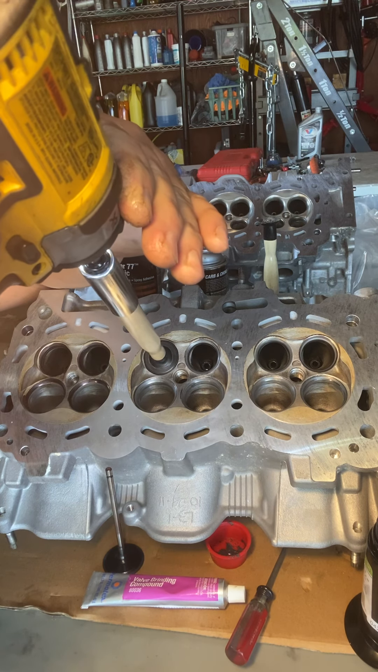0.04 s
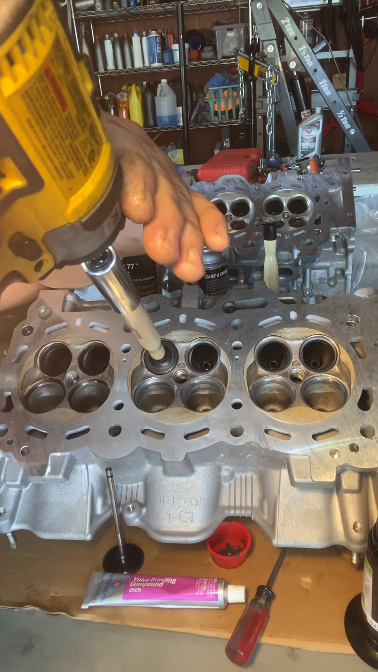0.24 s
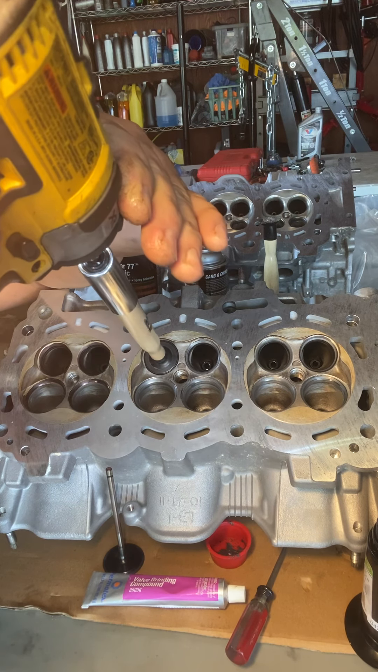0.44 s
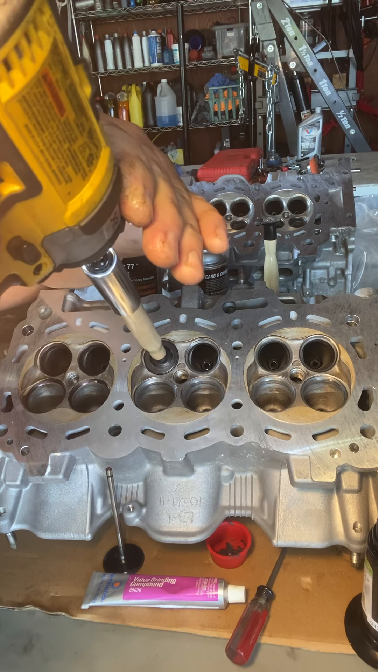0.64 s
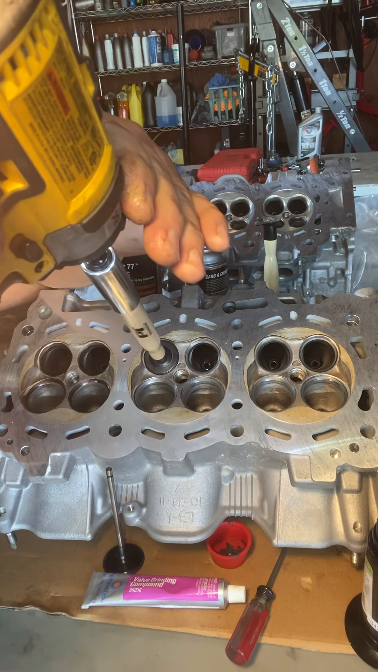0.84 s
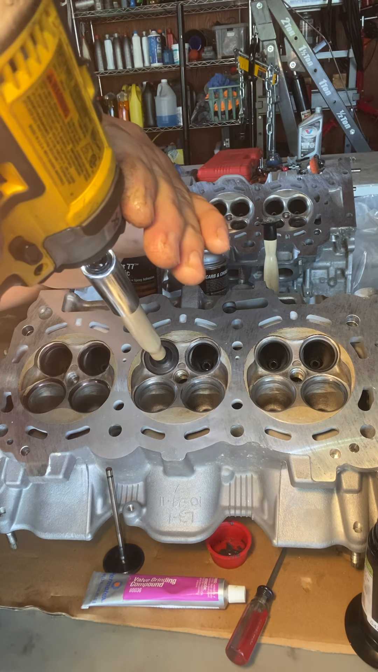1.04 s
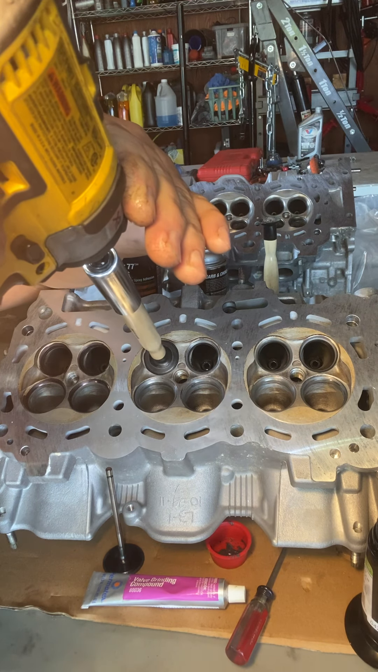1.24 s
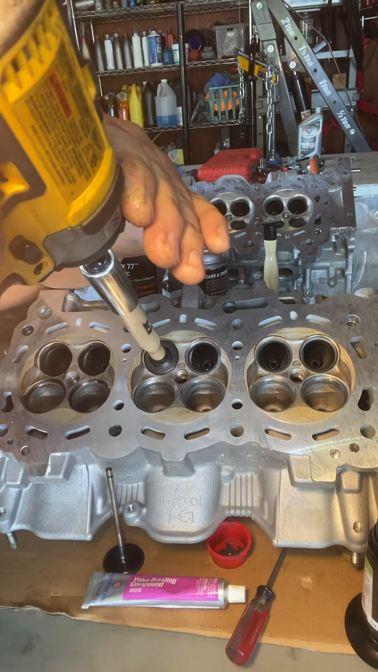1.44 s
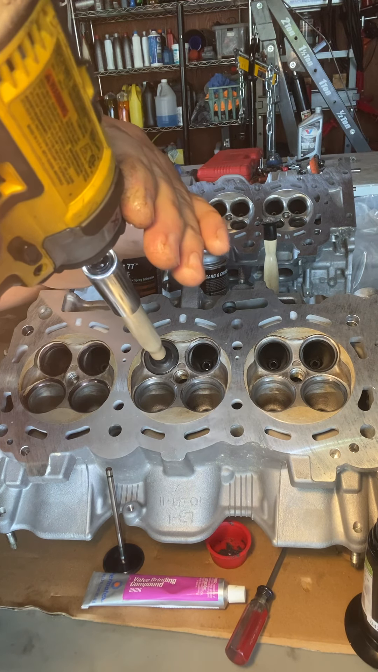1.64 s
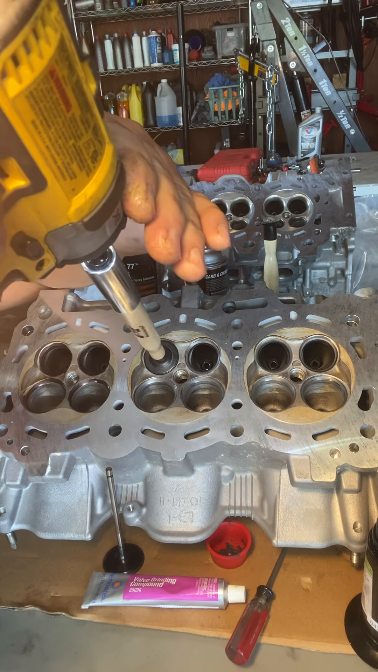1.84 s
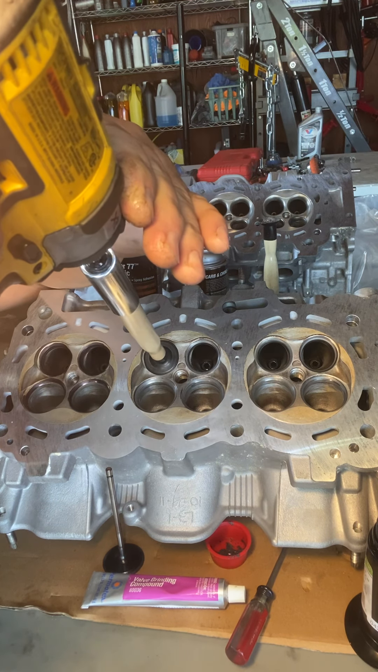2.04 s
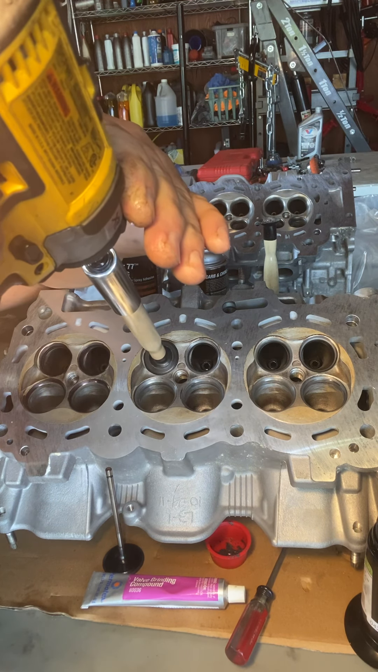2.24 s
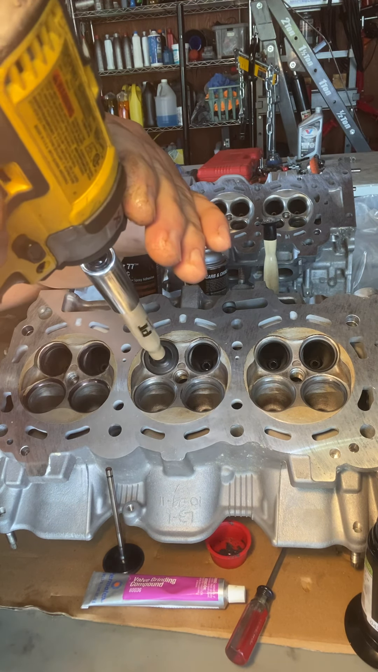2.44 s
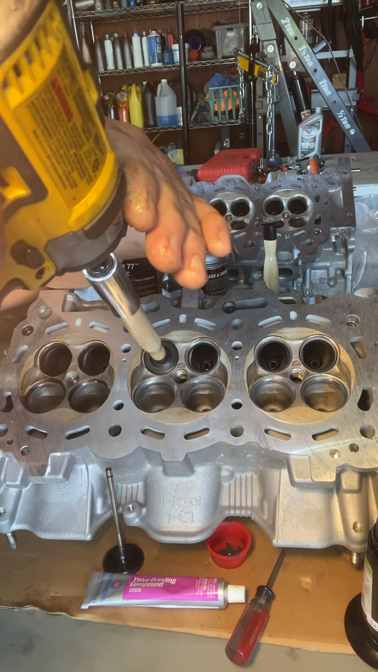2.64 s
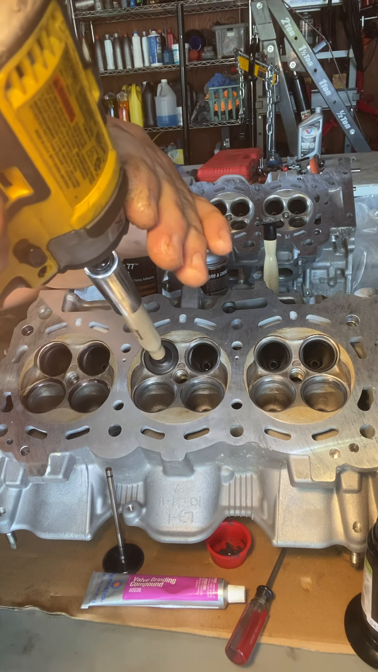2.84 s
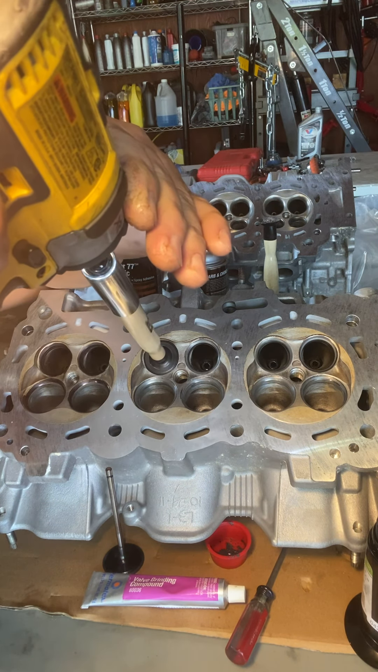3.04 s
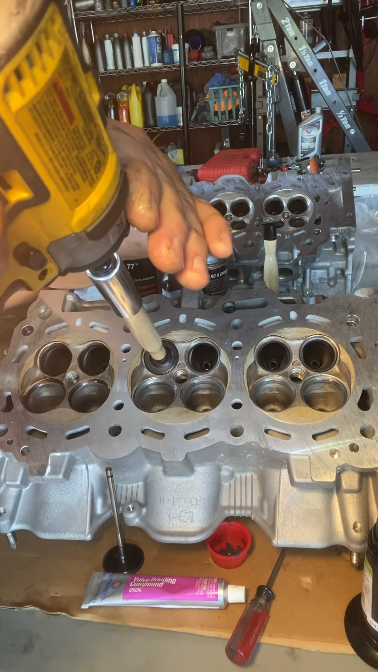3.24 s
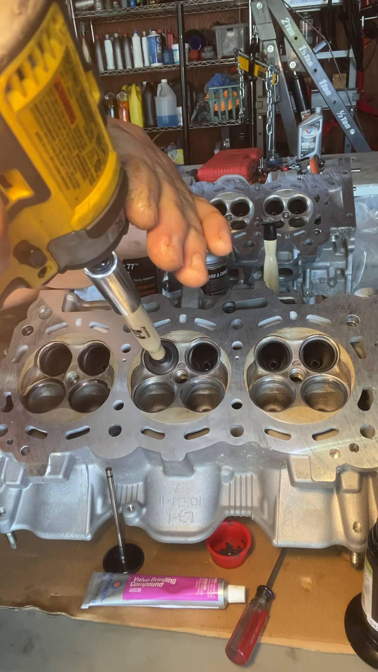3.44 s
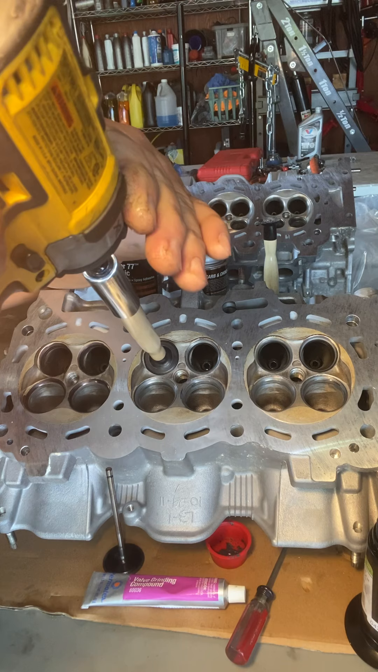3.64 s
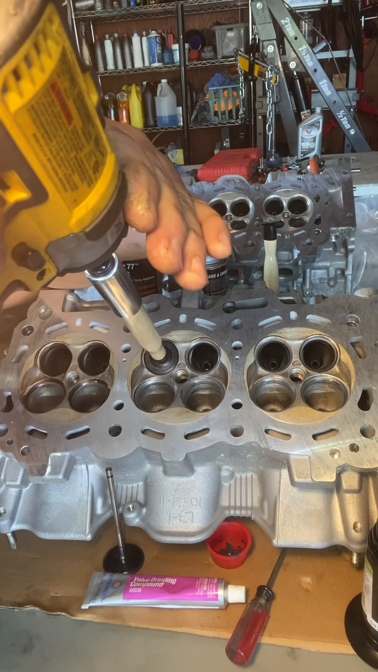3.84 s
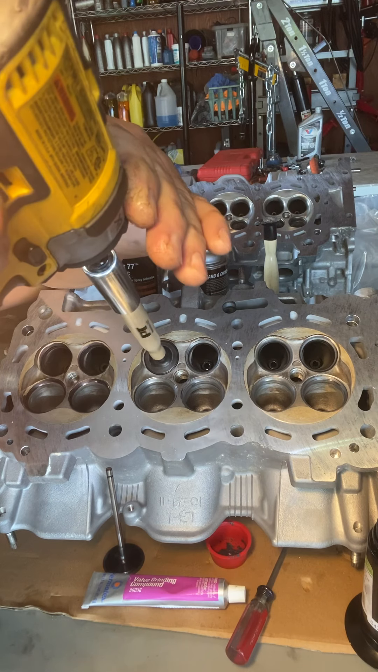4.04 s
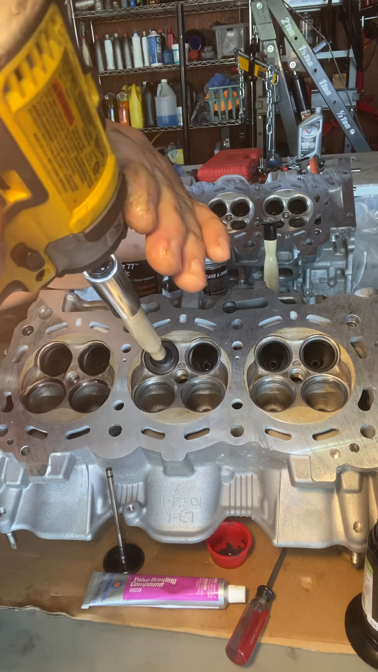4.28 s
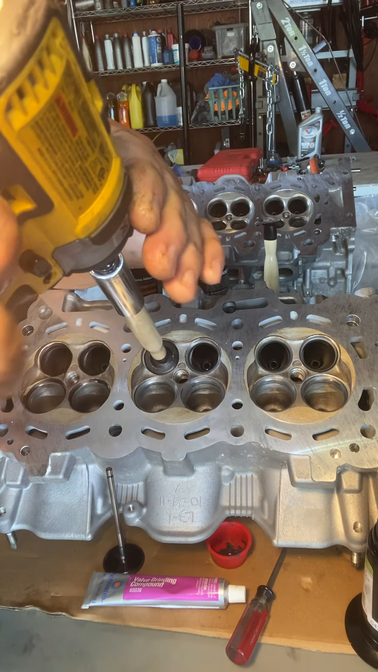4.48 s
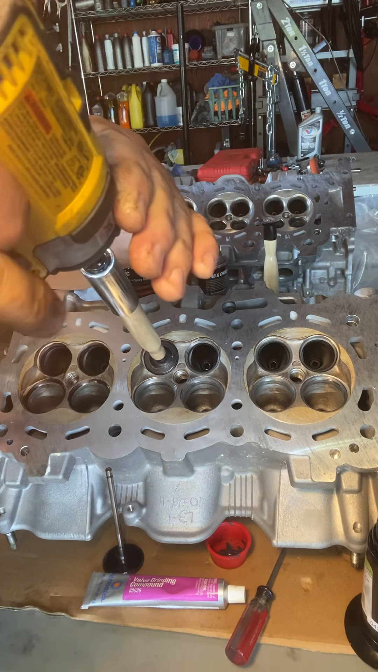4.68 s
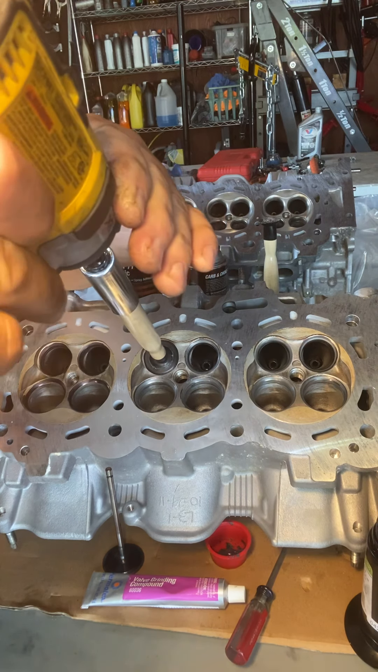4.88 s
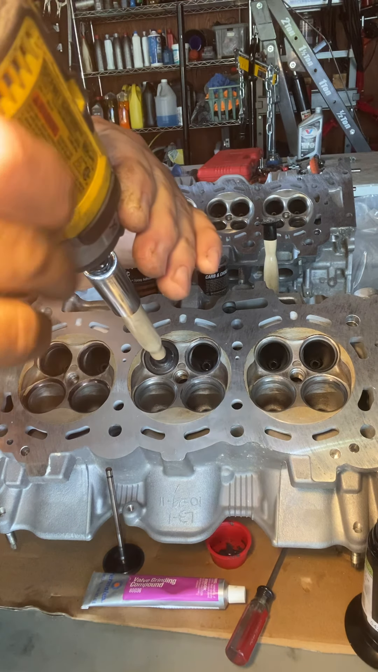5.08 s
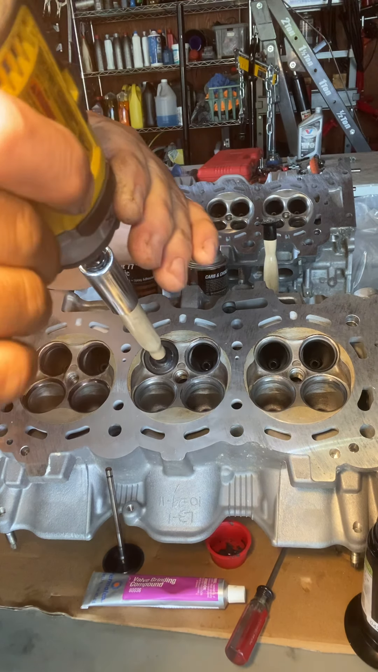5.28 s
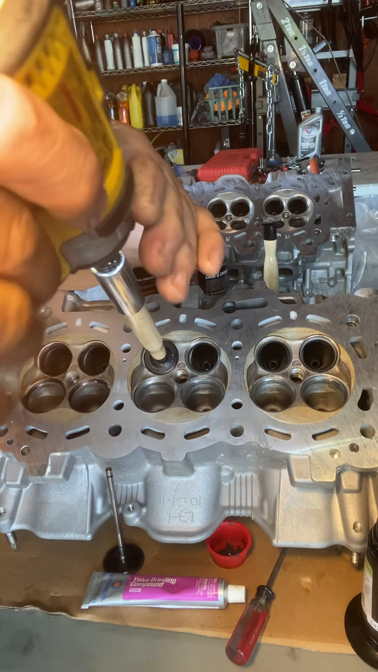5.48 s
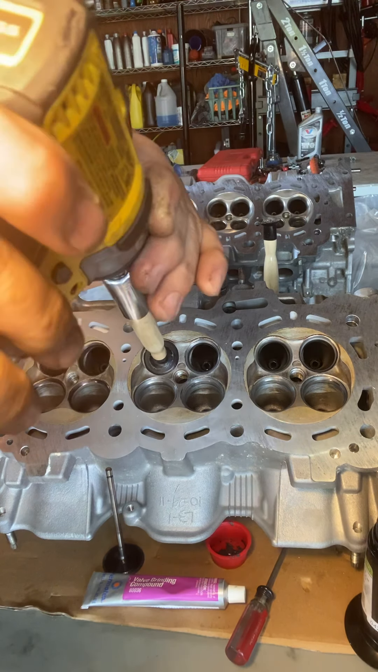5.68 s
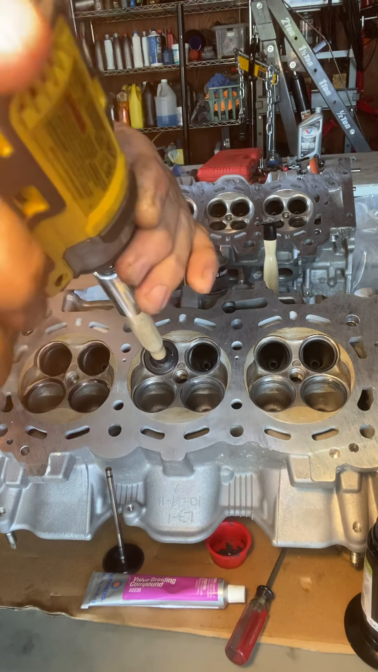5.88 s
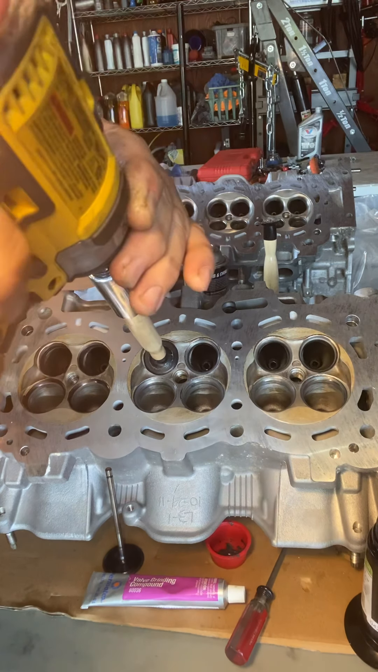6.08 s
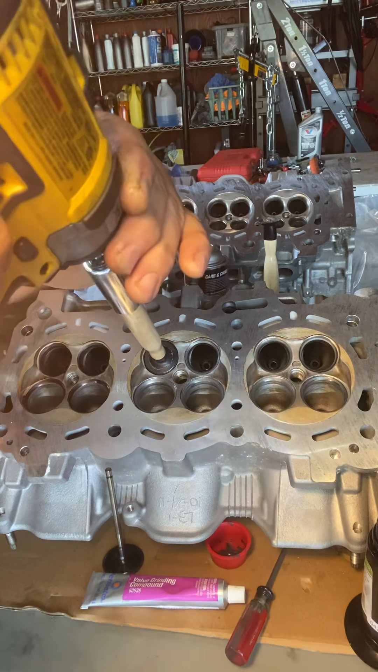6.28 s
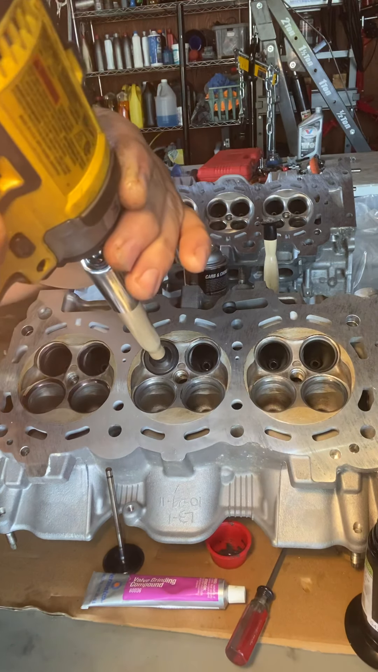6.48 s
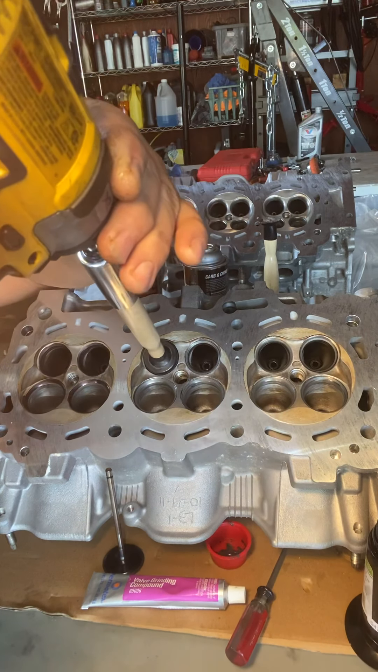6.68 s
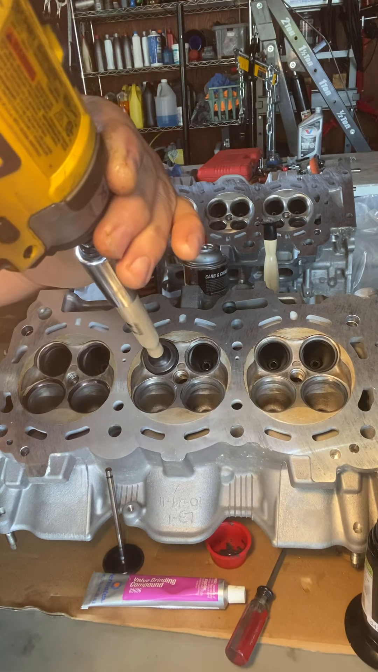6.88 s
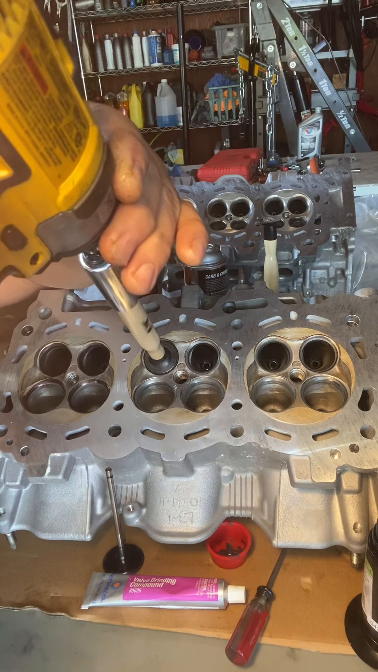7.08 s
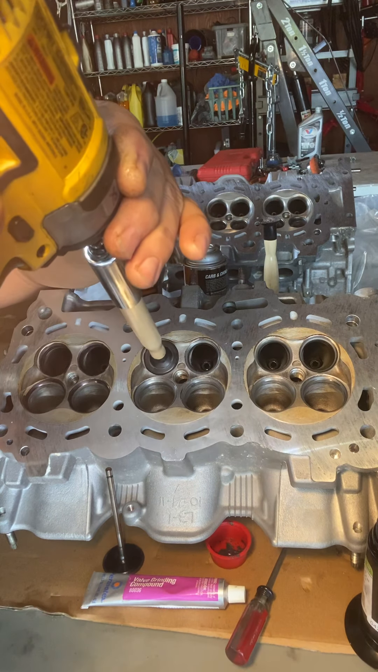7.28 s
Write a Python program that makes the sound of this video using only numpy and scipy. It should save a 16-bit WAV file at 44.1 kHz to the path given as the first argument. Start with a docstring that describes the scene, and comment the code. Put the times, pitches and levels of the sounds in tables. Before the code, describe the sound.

From 0 to 4.3 seconds, a cordless driver grinds a valve on its metal seat close by. Gritty hiss and bright head ringing run continuously, with a narrow stuttering chatter that fades as the paste wears. Gear knocks, roughly a hundred a second, form two rough bursts per half-second turn, separated by short dull rasps. At 4.32 a hard, dry click stops everything, with a brief loose rattle. Scattered knocks and light scrapes follow, strongest in a clustered clack near 5.2 and another at 5.45; gritty nudges come near 5.9 and 6.1, with very faint electronic whistles. At 6.27 the driver restarts lightly: socket rattle, then from 6.4 motor hum and wobbling gear whine with clicks. At 7.1 the valve bites, adding harsh grinding, rasp and chatter to the end. A small workshop gives short echoes over low rumble and faint wavering hum.

```python
"""Lapping an engine valve with a cordless driver

Close by, the driver spins a valve on its seat: grit hisses and rings the cylinder head, gears knock in bursts.
A sharp click rings the driver's nose, then the tool knocks in its socket as the grip changes.
The second run is light: the loose socket rattles, motor and gears whine, until the valve bites and grinds.
Noise and sine tones are shaped by resonances; a small workshop adds echoes, a low rumble and a wavering hum."""
import sys
import numpy as np
from scipy import signal
from scipy.fft import rfft, irfft, next_fast_len
from scipy.io import wavfile

SR = 44100
rng = np.random.default_rng(int(sys.argv[2]) if len(sys.argv) > 2 else 0)


def store_pcm(level_fs):
    """Save levels as 16-bit WAV."""
    pcm = np.round(np.clip(level_fs, -1, 1) * 32767).astype(np.int16)
    wavfile.write(sys.argv[1], SR, np.atleast_2d(pcm).T)


N = 322812
TIME = np.arange(N) / SR
SIZE = next_fast_len(N + SR)
FREQ = np.maximum(np.arange(SIZE // 2 + 1) * SR / SIZE, 1)

# loaded run: gear cycles per second at first, before surges and tremble; their slow sag; the motor is let go
LOADED_HZ, SAG_HZ_PER_S, STOP_S = 104.6, 2.2, 4.316
# the crooked tool bears hardest once a spindle turn: one such moment, and the length of a turn
HARDEST_S, TURN_S = 0.385, 0.53
# the paste wears fine between these times
WEAR_FROM_S, WORN_S = 1.12, 4.6
# the spindle lock shuts
LOCK_S = 4.3236
# second run: the motor starts, the socket catches the tool, the valve bites
START_S, CATCH_S, BITE_S = 6.267, 6.385, 7.106
# lightly loaded, the tool wobbles: one moment of tightest mesh, and the length of a wobble
TIGHTEST_S, WOBBLE_S = 6.67, 0.141


def undb(db):
    """Decibels to gain."""
    return np.exp(np.asarray(db) * (np.log(10) / 20))


def unit(x):
    """Scale to rms 1."""
    return x / np.sqrt(np.mean(x ** 2))


def shape(points):
    """Gain at every frequency from (Hz, dB) points, interpolated over log frequency."""
    hz, db = np.transpose(points)
    return undb(np.interp(np.log(FREQ), np.log(hz), db))


def filtered(x, response):
    """Pass a sound through a frequency response."""
    return irfft(rfft(x, SIZE) * response, SIZE)[:N]


def resonate(x, hz, width):
    """One resonance of the given width in Hz, gain 1 at its centre."""
    return signal.lfilter(*signal.iirpeak(hz, hz / width, fs=SR), x)


def resonate_twice(x, hz, width):
    """The same resonance twice over, for steeper sides."""
    return resonate(resonate(x, hz, width), hz, width)


def body(x, modes):
    """Ring a set of broad modes, with alternating signs."""
    return sum(undb(db) * resonate(x, hz, width) * (-1) ** k for k, (hz, width, db) in enumerate(modes))


def noise():
    """White noise."""
    return rng.standard_normal(N)


def walk(rate):
    """Smooth chance with spread 1, changing about rate times a second."""
    step = 32
    count = N // step + 1
    keep_slow = np.exp(-(np.fft.rfftfreq(count, step / SR) / rate) ** 2)
    slow = irfft(rfft(rng.standard_normal(count)) * keep_slow, count)
    return unit(np.interp(np.arange(N) / step, np.arange(count), slow))


def grains(spread_db):
    """Dense tiny fractures: noise whose level jumps every 16 samples."""
    sizes = np.repeat(rng.standard_normal(N // 16 + 1), 16)[:N]
    return unit(noise() * undb(spread_db * sizes))


def ticks(phase, scatter_db):
    """One impulse of uneven size for each whole cycle."""
    count = np.maximum.accumulate(np.floor(phase))
    return np.diff(count, prepend=count[0]) * undb(scatter_db * np.clip(noise(), -2, 2))


def held(start_s, end_s=np.inf, fade_s=0.0037):
    """Gain 1 from start to end, with short fades outside."""
    return np.clip(np.minimum(TIME - start_s, end_s - TIME) / fade_s + 1, 0, 1)


def swell(centre_s, width_s):
    """A bell-shaped rise and fall with peak 1."""
    return np.exp(-((TIME - centre_s) / width_s) ** 2)


def spindle_turns():
    """Turns made by the spindle under load."""
    return (TIME - HARDEST_S) / TURN_S


def each_turn(share, width, squareness=1):
    """A swell at the same place in every turn; squareness above 1 flattens its top and steepens its sides."""
    offset = (spindle_turns() - share + 0.5) % 1 - 0.5
    return np.exp(-abs(offset / width) ** (2 * squareness))


def wobble():
    """Swing of the lightly loaded tool, 1 where the gears mesh tightest."""
    return np.cos(2 * np.pi * (TIME - TIGHTEST_S) / WOBBLE_S)


def wear():
    """State of the paste, from 0 (fresh and coarse) to 1 (ground fine)."""
    return np.interp(TIME, [WEAR_FROM_S, WORN_S], [0, 1])


def workshop(air_db=-53, hum_hz=93.3, hum_db=-56, width_db=-12):
    """Low rumble and a wavering hum around the microphones; the rumble's upper air differs between the ears."""
    # Each row: frequency in Hz, relative level in dB per Hz of the workshop air.
    air_spectrum = [(20, -43), (37, -21), (62, -7.5), (86, -9.5), (130, -20), (255, -26.5), (560, -30.5),
                    (1200, -34.5), (2000, -38.5), (3000, -51.5), (7000, -56.5), (16000, -75)]
    mid, other = (unit(filtered(noise(), shape(air_spectrum))) for _ in range(2))
    side = undb(width_db) * filtered(other, FREQ / np.hypot(FREQ, 300))
    hum_cycles = np.cumsum(hum_hz + 1.48 * walk(3.83)) / SR
    hum = np.sin(2 * np.pi * hum_cycles) * undb(hum_db + 0.61 * walk(3.8))
    return undb(air_db) * np.array([mid + side, mid - side]) + hum


def gear_phase(wander=0.0048, surge=0.037, surge_share=0.07, surge_width=0.17,
               dip=0.018, dip_share=0.39, dip_width=0.07, light_sway=0.012, light_wander=0.005):
    """Gear cycles: loaded, they surge and are held back each turn and tremble; light, they sway with the wobble.

    The count keeps its loaded pace through the pause."""
    # Gear speed in the second run. Each row: time in seconds, cycles per second in Hz before sway and tremble.
    light_speed = [(6.26, 44.93), (6.33, 68), (6.42, 75.8), (6.48, 88.74), (6.68, 92.45), (6.77, 90.4),
                   (6.91, 93.1), (7.03, 91.03), (7.24, 89.7), (7.31, 86.4)]
    swing = surge * each_turn(surge_share, surge_width) - dip * each_turn(dip_share, dip_width)
    loaded = (LOADED_HZ - SAG_HZ_PER_S * TIME) * (1 + swing + wander * walk(25))
    light = np.interp(TIME, *np.transpose(light_speed))
    light = light * (1 + light_sway * wobble() + light_wander * walk(40))
    return np.cumsum(np.where(TIME < START_S, loaded, light)) / SR


def bearing(lag_turns=0, slack_db=-12):
    """How hard the crooked tool bears: it takes hold and lets go twice a turn, with slack between."""
    # Each row: place as a share of the turn, half width as a share of the turn, force in dB before slack.
    holds = [(0.018, 0.15, -4.5), (0.583, 0.093, -5.5)]
    grip = sum(undb(db) * each_turn(share + lag_turns, width, squareness=8.3) for share, width, db in holds)
    return np.hypot(undb(slack_db), grip)


def backlash(phase, level_db=-42.0, slop=0.005, scatter_db=1.3, growth_db=2.0, uneven_db=1.0, soft_hz=6000,
             valve_db=-6.0, valve_lag_turns=0.1, slide_db=-57):
    """Loaded gears slide and knock once a cycle, in two bursts a turn that start dull and crisp up as the valve jolts."""
    # What a knock of the teeth rings, damped by the hand.
    # Each row: frequency in Hz, width in Hz, relative level in dB.
    knock_modes = [(200, 55, -8), (390, 70, -9), (526, 130, -10.5), (750, 85, -1), (822, 100, 3),
                   (1054, 110, -1.5), (1157, 150, 0.5), (1350, 120, -1)]

    def case(x):
        """The gear case heard through the hand's damping."""
        return unit(sum(undb(db) * resonate(x, hz, width) for hz, width, db in knock_modes))

    blows = undb(level_db + growth_db * wear() + uneven_db * walk(5))
    # grease softens each contact
    contact = filtered(ticks(phase + slop * walk(60), scatter_db), np.exp(-(FREQ / soft_hz) ** 2))
    valve = unit(resonate(resonate(contact, hz=1860, width=890), hz=1960, width=1300))
    jolts = undb(valve_db) * bearing(valve_lag_turns) * valve
    sliding = undb(slide_db) * case(noise())
    return held(0, STOP_S) * (blows * (bearing() * case(contact) + jolts) + sliding)


def whine(phase, orders, flutter_db):
    """Harmonics of the turning gears, each fluttering a little."""
    return unit(sum(undb(db + flutter_db * walk(21)) * np.sin(2 * np.pi * k * phase) for k, db in orders))


def grinding(phase, force, ring_db, hiss_db=-1.0, ring_width=9, throb=0.12, patchy_db=1.5):
    """Grit crushed on the seat hisses and rings the head; the hiss throbs twice a gear cycle."""
    # Each row: frequency in Hz, relative level in dB per Hz of the crushed grit.
    grit_spectrum = [(200, -17), (600, -10.5), (1300, -4), (1550, -3.5), (1800, -1), (2500, -1.5),
                     (3200, -4), (4300, 1.5), (4900, -3), (6300, -1.5), (7100, 2), (8000, -0.5), (9600, -2),
                     (10200, -6), (11400, -7), (12200, -34), (14000, -83.5)]
    # Modes of the cylinder head. Each row: frequency in Hz, relative level in dB.
    head_modes = [(2277, -64), (3122, -57.5), (3451, -60.5), (3696, -53), (3835, -61), (4030, -64.5),
                  (4506, -60.5), (4770, -62.5), (5060, -65.5), (5636, -57), (5733, -61.5), (5829, -54),
                  (5997, -55.5), (6078, -58), (6148, -64.5), (6487, -63.5), (6600, -56.5), (6691, -51.5),
                  (6934, -63), (7070, -57.5), (7114, -52.5), (7254, -54.5), (7407, -61.5), (7720, -57),
                  (8341, -57.5), (8771, -65), (8942, -52.5), (9135, -67.5), (9254, -60.5), (9481, -55.5),
                  (9647, -61), (10977, -60.5)]
    crush = grains(spread_db=3) * force * (1 + throb * np.cos(4 * np.pi * phase))
    hiss = filtered(crush, unit(shape(grit_spectrum)))
    # the contact travels round the seat, so each mode is fed unevenly
    feed = force * noise()
    ring = sum(undb(db + patchy_db * walk(11)) * resonate(feed, hz, ring_width) for hz, db in head_modes)
    ring = signal.sosfilt(signal.cheby1(8, 0.5, 11500, fs=SR, output="sos"), ring)
    return undb(hiss_db) * hiss + undb(ring_db) * unit(ring) * np.std(crush)


def chatter(hz, width):
    """Stick and slip of the valve face in one narrow resonance."""
    return unit(resonate_twice(grains(0.55), hz, width))


def lapping(phase, grit_db=-37, grit_wear_db=3, whine_db=-15.5, whine_wear_db=3, unsteady_db=0.5,
            scour_db=2, scour_share=0.73, scour_width=0.17, ring_db=0.57, ring_wear_db=2.5):
    """The loaded valve scours hardest once a turn; grinding, ringing, chatter and whine fade as the paste wears."""
    # Gear harmonics under load. Each row: multiple of the gear cycle, relative level in dB.
    loaded_orders = [(2, -6), (3, 1.5), (4, -4.5), (5, -3.5), (7, -4), (8, -2), (11, -5)]
    # Resonances in which the valve face chatters. Each row: frequency in Hz, width in Hz,
    # level in dB with fresh paste before the swing of pressure, dB lost by wear.
    face_modes = [(2052, 144, -40.5, 19.5), (2278, 47, -49, 13.5), (2722, 61, -53, 8)]
    pressure = held(0, STOP_S) * undb(scour_db * (each_turn(scour_share, scour_width) - 0.5))
    grit = pressure * undb(grit_db - grit_wear_db * wear() + unsteady_db * walk(3.0))
    gear_tone = undb(whine_db - whine_wear_db * wear()) * grit * whine(phase, loaded_orders, flutter_db=2.5)
    gears = backlash(phase) + gear_tone
    valve = pressure * sum(undb(db - wear_db * wear()) * chatter(hz, width)
                           for hz, width, db, wear_db in face_modes)
    return gears + grinding(phase, grit, ring_db - ring_wear_db * wear()) + valve


def shudder(first_db=-49, settle_s=0.34, bite_db=-37.5):
    """The valve shudders an octave below its chatter: at first, soon settling, and again from the late bite."""
    return (undb(first_db) * swell(0, settle_s) + undb(bite_db) * held(BITE_S)) * chatter(hz=1017, width=55)


def drag(length_s=0.046):
    """The tool drags in its socket with a short, dull rasp, between bursts and once in the light run."""
    # Each row: time in seconds, level in dB.
    drags = [(1.11, -50.5), (1.64, -48.5), (2.18, -46), (2.68, -47), (3.22, -46), (3.74, -48.5),
             (6.84, -47.5)]
    # Each row: frequency in Hz, relative level in dB per Hz of the rasp.
    rasp_spectrum = [(150, -26.5), (350, -1.5), (750, 0), (1300, -6.5), (2500, -19), (8000, -43)]
    force = sum(undb(db) * swell(s, length_s) for s, db in drags)
    return force * unit(filtered(grains(spread_db=5), shape(rasp_spectrum)))


def stop_click(level_db=19.5, crack_db=-26, crack_s=0.0024, crack_hz=6900, crack_width=3800, top_hz=9000):
    """The spindle lock snaps shut: one hard blow rings the driver's nose, with a short dry crack."""
    # Modes of the driver's nose. Each row: frequency in Hz, width in Hz, relative level in dB.
    nose_modes = [(338, 100, -12.5), (765, 130, -5.5), (1014, 130, 1), (1330, 170, 1.5), (1660, 160, 4.5),
                  (2400, 170, 1.5), (3800, 390, -3)]
    since = np.arange(N) - int(LOCK_S * SR)
    blow = 1.0 * (since == 0)
    crack = noise() * (since >= 0) * np.exp(-abs(since) / (crack_s * SR))
    crack = undb(crack_db) * resonate_twice(crack, crack_hz, crack_width)
    soften = signal.butter(4, top_hz, fs=SR, output="sos")
    return undb(level_db) * signal.sosfilt(soften, body(blow, nose_modes) + crack)


def settling(level_db=-35, t60=0.16, hz=2500, width=3000):
    """After the lock shuts, loose gears rattle briefly to rest."""
    fade = held(LOCK_S) * np.exp(-np.log(1000) * abs(TIME - LOCK_S) / t60)
    return undb(level_db) * fade * unit(resonate_twice(grains(spread_db=4), hz, width))


def knocks(level_db=12, scrape=0.24, top_hz=12000):
    """Each knock is a hard contact and a short burst of rubbing that ring the tool's modes."""
    # Knocks of tool and socket. Each row: start in seconds, relative level in dB,
    # slope away from the socket's main ring in dB per octave, 60 dB decay of the scrape in seconds.
    blows = [(4.454, -48, 6.5, 0.027), (4.515, -36.5, -1.5, .008), (4.55, -45.5, 0.5, 0.0084),
             (4.916, -55, 4, 0.0055), (4.958, -33.5, -3, 0.079), (5.04, -54, 1, 0.2), (5.097, -45, -5, .06),
             (5.144, -39, 0, 0.021), (5.2076, -9.5, -2.5, 0.017), (5.213, -41, 12, 0.019),
             (5.2315, -9.5, -3.5, 0.0094), (5.234, -12.5, 2, 0.018), (5.24, -31, 4, .012),
             (5.446, -17, 2.5, 0.013), (6.1983, -26, -13.5, 0.023), (6.263, -24, 0, 0.025),
             (6.274, -28, 1.5, .008), (6.288, -30, 4.5, 0.0099), (6.383, -19, 6.5, 0.003),
             (6.387, -21, 1.5, 0.023), (6.4165, -27, 2, .008), (6.767, -31, 0, .005),
             (6.7708, -29, 1, 0.0061), (6.9972, -31, 3.5, .006), (7.014, -29, 0, .006),
             (7.105, -23, -14, .014), (7.3044, -17, -11, 0.012)]
    # Modes of tool and socket. Each row: frequency in Hz, width in Hz, relative level in dB.
    tool_modes = [(346, 115, -6), (737.6, 85, -7), (1002, 133, 0.5), (1380, 160, -2), (1645, 126, 3.5),
                  (2280, 167, 4.5), (3040, 430, 1), (3630, 590, 1.4), (4220, 330, 1), (5020, 570, -3),
                  (5980, 750, -3), (7470, 960, -4), (10400, 1740, -13.5)]
    out, size = np.zeros(SIZE), 4096
    t, hz = np.arange(size) / SR, np.arange(size // 2 + 1) * SR / size
    octaves_away = abs(np.log2(np.clip(hz, 300, 8000) / 1500))
    lead = size // 64  # room ahead of the contact for the filter's spread
    for s, db, tilt, t60 in blows:
        push = scrape * rng.standard_normal(size) * np.exp(-np.log(1000) * t / t60)
        push[0] = 1
        # a square blow mostly rings the socket; a glancing one also gives thud and crack
        colour = undb(tilt * octaves_away)
        start = int(s * SR) - lead
        out[start:start + size] += undb(db) * irfft(rfft(np.roll(push, lead)) * colour)
    soften = signal.butter(2, top_hz, fs=SR, output="sos")
    return undb(level_db) * signal.sosfilt(soften, body(out[:N], tool_modes))


def nudges():
    """Force on the grit as the hand shifts the valve: each nudge rises and dies away."""
    # Each row: peak time in seconds, force on the grit in dB, rise in seconds, fall in seconds.
    hand_shifts = [(4.85, -75.5, 0.039, 0.047), (5.06, -73, 0.0091, 0.071), (5.56, -69.5, 0.11, 0.14),
                   (5.87, -55.5, 0.0059, 0.016), (6.095, -60.5, .001, 0.034)]
    return sum(undb(db) * np.exp(np.minimum((TIME - s) / rise, (s - TIME) / fall))
               for s, db, rise, fall in hand_shifts)


def speed_control():
    """The switched motor current whistles faintly, the trigger barely pressed, before the spindle moves."""
    # Each row: start in seconds, end in seconds, mean frequency in Hz, level in dB.
    whistles = [(4.97, 5.15, 7500, -79), (6.014, 6.1, 7500, -75), (6.102, 6.25, 3700, -74),
                (6.1, 6.247, 7400, -82)]
    clock = np.cumsum(1 + 0.003 * walk(80)) / SR
    return sum(undb(db) * held(start, end, fade_s=0.017) * np.sin(2 * np.pi * hz * clock)
               for start, end, hz, db in whistles)


def rattle(phase, scatter_db=3.0, tick_s=0.0031, slop=0.018, scuff=0.16, snap=3.0):
    """The loose socket ticks twice a gear cycle: a hard snap, a short scratch, and a light scuff between ticks."""
    # Each row: frequency in Hz, relative level in dB per Hz of the rattle.
    rattle_spectrum = [(60, -31.5), (150, 8), (230, -4), (500, 2.5), (900, 5.5), (1400, 2.5), (1700, 8),
                       (2030, 4.5), (2250, 3.5), (2800, 2.5), (3500, 7.5), (4150, 7.5), (4600, 0),
                       (7300, -1), (10500, -11), (15500, -44)]
    contact = ticks(2 * phase + slop * walk(120), scatter_db)
    scratch = signal.lfilter([1], [1, -np.exp(-1 / (tick_s * SR))], contact)
    return unit(filtered(snap * contact + noise() * (scratch + scuff), shape(rattle_spectrum)))


def rub():
    """Sliding teeth heard through the gear case."""
    # Modes of the gear case. Each row: frequency in Hz, width in Hz, relative level in dB.
    case_modes = [(397, 150, -14.5), (779, 49, 4), (1090, 146, -3), (1427, 37, 1), (1930, 250, -5.5)]
    return unit(body(grains(spread_db=6.0), case_modes))


def light_run(phase, idle_db=-10, gear_db=-47.5, wobble_db=5.5, rattle_db=-42.0, hum_db=-49.0,
              hum_flutter_db=3.5, spin_up_s=0.076, uneven_db=1.9):
    """The socket rattles, louder once it catches the tool; motor hum and gear whine rise, the gears with each wobble."""
    # Gear harmonics when lightly loaded. Each row: multiple of the gear cycle, relative level in dB.
    light_orders = [(8.2, 7), (12, -2), (14.5, 0.5), (18.2, -1), (22, -3.5)]
    # The socket clatters harder for a moment. Each row: time in seconds, half length in seconds, level in dB.
    clatters = [(6.299, 0.02, -45), (6.436, 0.016, -43), (6.562, 0.017, -58), (6.687, 0.019, -50),
                (6.78, .014, -46), (7.305, .022, -34)]
    drive = held(START_S) * undb(idle_db * (1 - held(CATCH_S)))
    spun_up = np.clip((TIME - CATCH_S) / spin_up_s, 0, 1)
    # the motor hums at four times the gear cycle
    hum = spun_up * undb(hum_db + hum_flutter_db * walk(36)) * np.sin(8 * np.pi * phase)
    teeth = undb(-0.3) * spun_up * whine(phase, light_orders, flutter_db=3.5) + undb(-4) * rub()
    shaking = drive * undb(rattle_db + uneven_db * walk(22))
    shaking = shaking + sum(undb(db) * swell(s, width) for s, width, db in clatters)
    return hum + drive * undb(gear_db + wobble_db * wobble()) * teeth + shaking * rattle(phase)


def bite(phase, grit_db=-40, chatter_db=-38.5, rub_db=-43.5, rasp_db=-44):
    """Biting hard, the valve rasps, grinds and chatters again."""
    face = undb(chatter_db) * chatter(hz=2040, width=180) + undb(rasp_db) * chatter(hz=900, width=220)
    return held(BITE_S) * (grinding(phase, undb(grit_db), ring_db=0.5) + face + undb(rub_db) * rub())


def room(x, wet_db=-11, t60_low=0.33, t60_high=0.28, spread=0.37, gap_s=0.00099):
    """Echoes from shelves and walls, a little shorter in the treble and partly alike in both ears."""
    build = np.clip(TIME / gap_s - 1, 0, 1)
    low_share = 1 / (1 + (FREQ / 4000) ** 2)
    tails = []
    for _ in range(2):
        low, high = (rfft(noise() * build * np.exp(-np.log(1000) * TIME / t60), SIZE)
                     for t60 in (t60_low, t60_high))
        response = (low * low_share + high * (1 - low_share)) * FREQ / np.hypot(FREQ, 1100)
        tails.append(filtered(x, response / np.sqrt(np.mean(abs(response) ** 2))))
    return undb(wet_db) * np.array([tails[0] + spread * tails[1], tails[0] - spread * tails[1]])


def ports(x, bench_db=-16, bench_s=0.0094):
    """Direct sound at two microphone ports: mids lean left, treble is out of step, the bench reflects unevenly."""
    # Out-of-step part. Each row: frequency in Hz, side minus mid in dB.
    side_levels = [(100, -18.5), (700, -15.5), (1300, -10.5), (2100, -11.5), (2600, 3.5), (3200, -10.5),
                   (7000, -63.5), (8500, -2), (10500, -2), (12500, 22), (16000, 16.5)]
    # Lean. Each row: frequency in Hz, left minus right in dB.
    balance = [(380, -1), (700, 4), (1300, 2.5), (2400, 1.5), (4400, 0)]
    lean = shape(balance)
    bench = noise() * np.exp(-TIME / bench_s)
    scatter = undb(bench_db) * rfft(bench, SIZE) / np.linalg.norm(bench)
    # -1j sets this part a quarter cycle behind
    side = filtered(x, (lean - 1) / (lean + 1) - 1j * shape(side_levels) + scatter)
    return np.array([x + side, x - side])


def scene(click_room_db=-4.5, knock_room_db=-1):
    """Loaded lapping, a click and a pause with knocks, a light rattling run, and the valve biting again."""
    phase = gear_phase()
    pause = grinding(phase, nudges(), ring_db=1.0, hiss_db=-1.5) + speed_control()
    work = lapping(phase) + shudder() + drag() + pause + light_run(phase) + bite(phase)
    click, handling = stop_click(), knocks()
    # the driver is nearer than the valve, so its blows sound drier
    echoes = room(work + undb(click_room_db) * click + undb(knock_room_db) * handling)
    return ports(work + click + settling() + handling) + echoes + workshop()


def record(dry, top_hz=16300):
    """The recorder cuts the top with a steep low-pass."""
    return signal.sosfilt(signal.ellip(8, 0.2, 70, top_hz, fs=SR, output="sos"), dry)


dry = scene()
out = record(dry)
store_pcm(out)
```